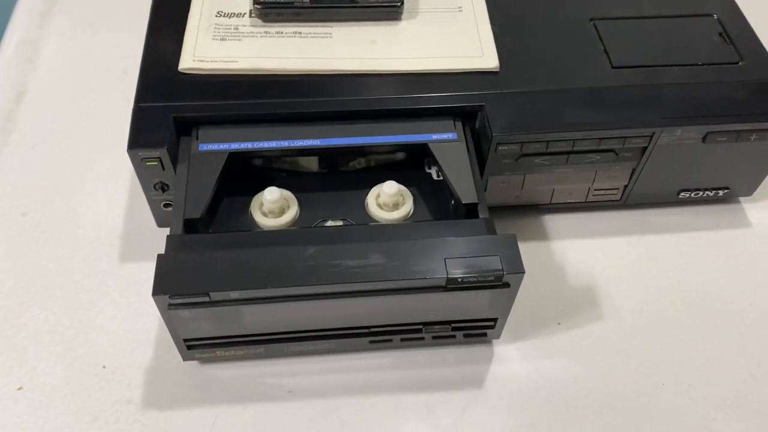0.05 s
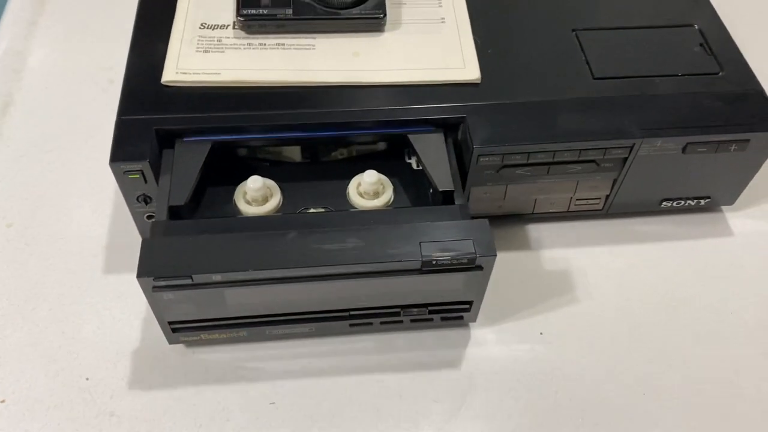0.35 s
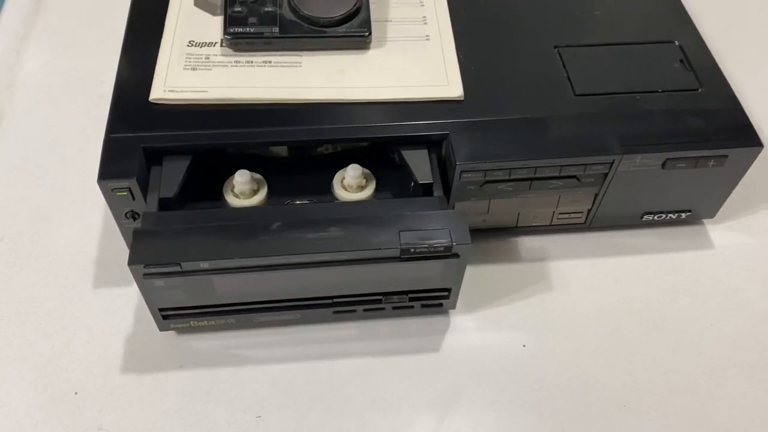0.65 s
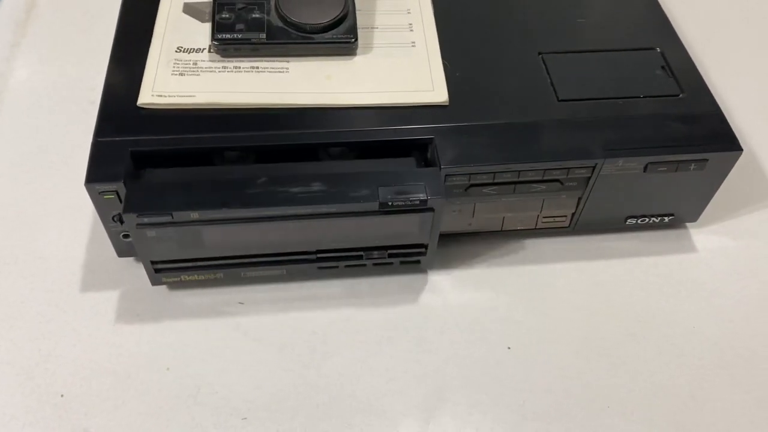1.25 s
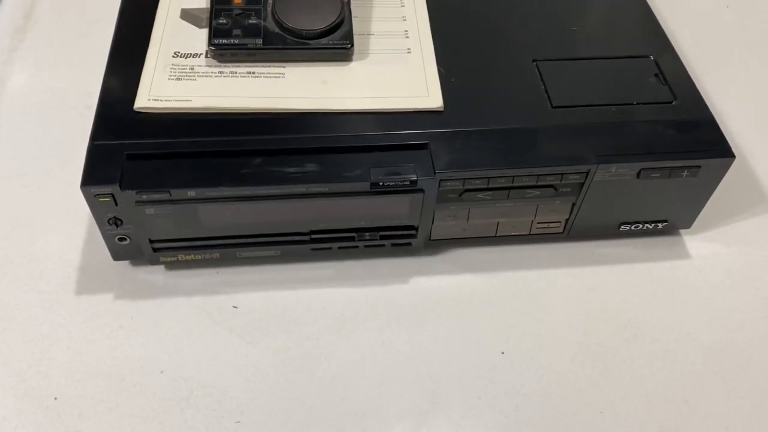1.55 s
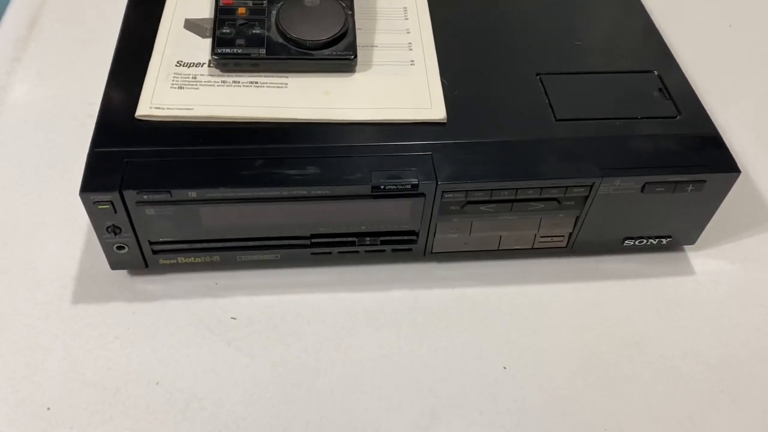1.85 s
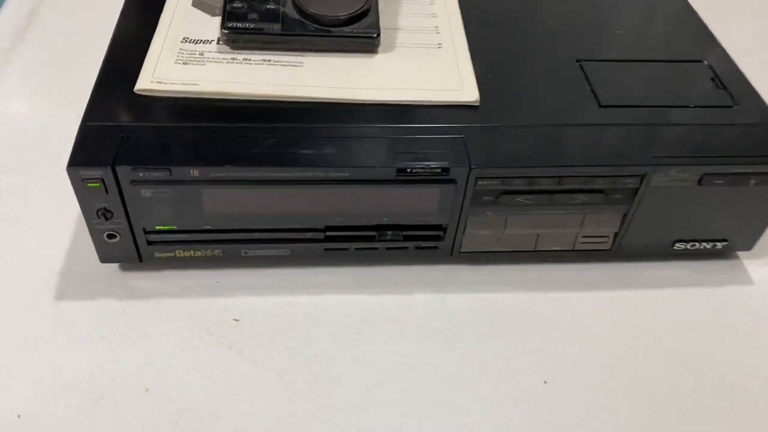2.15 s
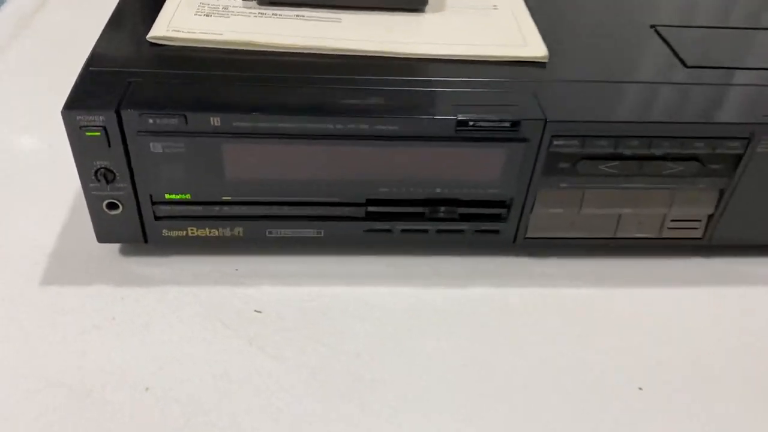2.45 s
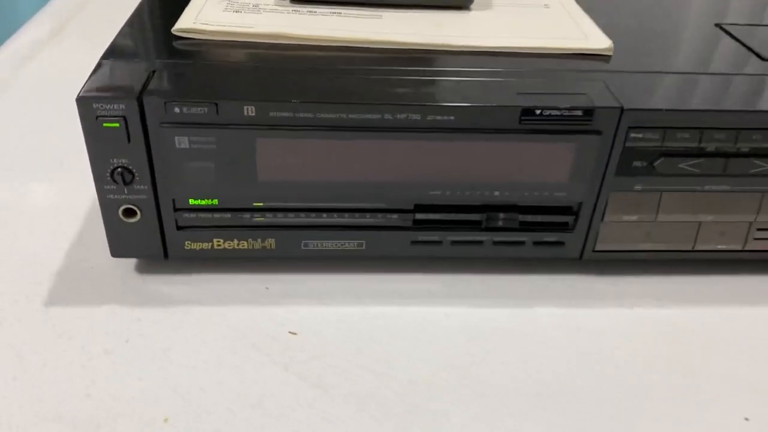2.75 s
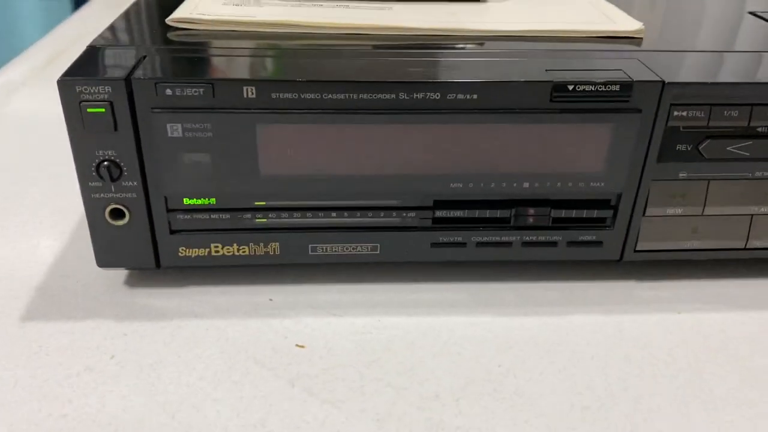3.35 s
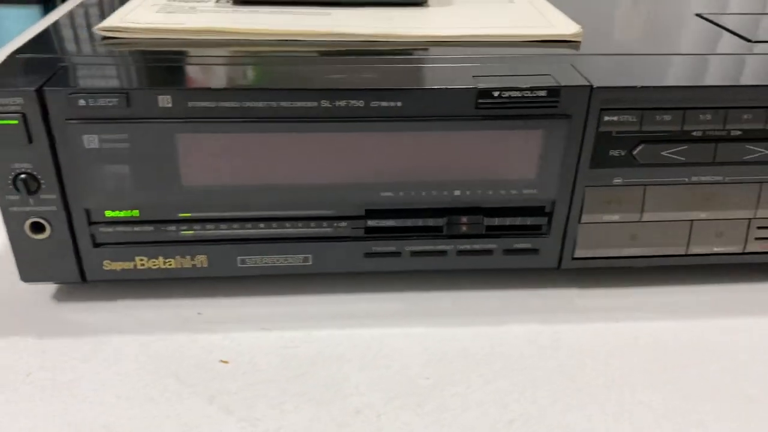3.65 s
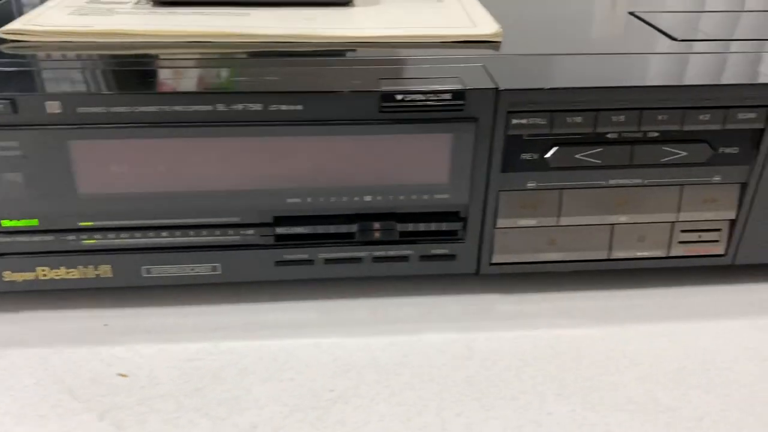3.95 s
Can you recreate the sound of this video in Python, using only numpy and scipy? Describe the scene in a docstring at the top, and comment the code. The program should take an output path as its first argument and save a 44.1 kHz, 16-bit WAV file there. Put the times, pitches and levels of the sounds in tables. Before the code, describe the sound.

A video recorder's motorized tray slides closed near the microphone, with a wavering whir and plastic gear chatter. It scrapes and knocks lightly, then shuts with a clunk, and only a low hum remains in the small room.

```python
"""A small motor hums, whines and rattles close by, drawing a cassette tray shut in a quiet room.
Its tones are harmonics of the shaft rotation; gear tooth impacts excite resonances of the plastic case.
The tray rubs in its rails, bumps on the way and thuds home, ringing in damped modes.
The motor stops, leaving mains hum, a thin transformer buzz, room rumble and two faint rustles."""
import sys
import numpy as np
from scipy import signal
from scipy.fft import rfft, irfft, next_fast_len
from scipy.io import wavfile
from scipy.ndimage import map_coordinates

SR = 44100
rng = np.random.default_rng(int(sys.argv[2]) if len(sys.argv) > 2 else 0)


def store_pcm(level_fs):
    """Save levels as 16-bit WAV."""
    pcm = np.round(np.clip(level_fs, -1, 1) * 32767).astype(np.int16)
    wavfile.write(sys.argv[1], SR, np.atleast_2d(pcm).T)


N = 176400
LEAD = SR // 4  # samples before time zero: the motor is already running
T = np.arange(-LEAD, N) / SR

# likeness of left and right for nearby noises: (frequency [Hz], correlation [1])
NEAR_CORRELATION = [(60, 0.78), (150, 1), (380, 1), (950, 1), (2380, 0.11), (5980, 0.097), (15000, 0.26)]


def amp(db):
    """Decibels to amplitude ratio."""
    return 10 ** (np.asarray(db) / 20)


def unit(x):
    """Normalisation to rms 1."""
    return x / np.sqrt(np.mean(x ** 2) + 1e-20)


def along(points, hz):
    """Interpolation of (frequency [Hz], value) points on a logarithmic axis."""
    f, v = np.transpose(points)
    return np.interp(np.log(hz + 1), np.log(f + 1), v)


def curves(rows):
    """Linear interpolation in time: one curve for each column after the first."""
    times, *columns = np.transpose(rows)
    return [np.interp(T, times, column) for column in columns]


def wobble(rate):
    """Smooth random modulation: a spline through `rate` Gaussian knots a second."""
    knots = rng.standard_normal(4096)
    return map_coordinates(knots, [(T - T[0]) * rate], mode="wrap")


def filtered(x, response):
    """Linear filtering: the spectrum of x times a frequency response."""
    size = next_fast_len(len(T) + SR // 2)
    return irfft(rfft(x, size) * response(np.fft.rfftfreq(size, 1 / SR)), size)[..., :len(T)]


def coloured(x, spectrum):
    """Broad spectral shaping, at rms 1."""
    return unit(filtered(x, lambda hz: amp(along(spectrum, hz))))


def resonate(x, peaks):
    """Forced response of second-order resonators in parallel, at rms 1."""
    return unit(filtered(x, lambda f: sum(
        amp(db) * 1j * f * width / (hz * hz - f * f + 1j * f * width) for hz, width, db in peaks)))


def swells(x, rows):
    """Resonances that each rise and fall under a Gaussian envelope."""
    return sum(amp(db) * np.exp(-((T - peak_s) / half_s) ** 2) * resonate(x, [(hz, width, 0)])
               for hz, width, db, peak_s, half_s in rows)


def noise(correlation):
    """Partly coherent white stereo noise: the mid-to-side ratio sets the correlation."""
    def weights(hz):
        angle = np.arccos(np.clip(along(correlation, hz), -.99, .99)) / 2
        return np.array([np.cos(angle), np.sin(angle)])
    mid, side = filtered(rng.standard_normal((2, len(T))), weights)
    return np.array([mid + side, mid - side])


def room(x):
    """Reverberation: convolution with a diffuse tail that decays exponentially in each band."""
    # room decay: (frequency [Hz], T60 [s])
    decay = [(100, 0.47), (500, 0.38), (2500, 0.44), (7000, 0.45), (14000, 0.15)]
    hz, t, bands = signal.stft(rng.standard_normal((2, SR // 2)), SR, nperseg=256)
    tail = signal.istft(bands * amp(-60 * t / along(decay, hz)[:, None]), SR, nperseg=256)[1]
    tail = tail + 0.28 * tail[::-1]  # left and right share some reflections
    wet = signal.fftconvolve(x, tail / np.linalg.norm(tail[0]), axes=1)[:, :len(T)]
    return filtered(wet, lambda hz: amp(along([(150, 3.0), (500, 5.25), (1500, 0.58)], hz)))


def background():
    """Broadband room rumble under the line spectrum of mains hum, which grows after the motor stops."""
    # rumble spectrum: (frequency [Hz], relative density [dB])
    spectrum = [(25, -17), (42, -6.5), (60, 2), (135, -9.5), (240, -3.5), (450, -13.5), (540, -20.5),
                (1900, -39.5), (2500, -42), (3300, -48.5), (6900, -50.5), (15000, -69)]
    # hum lines: (frequency [Hz], level at a rise gain of 0 dB [dB])
    lines = [(59.6, -76), (119.5, -69.5), (174, -67), (241, -65), (273.5, -70), (313, -66), (358, -62),
             (365, -67.5)]
    # rise of the hum: (time [s], gain [dB])
    rise = [(2, -4.5), (3.1, 0.5), (4, -0.5)]
    rise_db, = curves(rise)
    rumble_gain = amp(-54 + 0.1 * rise_db + 0.4 * wobble(2.6))
    air = noise([(100, 0.97), (400, 0.2), (1200, 0.077), (5000, 0.06)])
    hum = sum(amp(db + wobble(3.58)) * np.sin(2 * np.pi * (hz * T + rng.random()) + 0.8 * wobble(8.1))
              for hz, db in lines)
    return rumble_gain * coloured(air, spectrum) + amp(rise_db) * np.sqrt(2) * hum


def transformer_buzz(pulse_hz=59.45, level_db=-90):
    """Periodic excitation: a pulse train drives the transformer's resonances, heard through the room."""
    # core resonances: (frequency [Hz], bandwidth [Hz], relative level [dB])
    core = [(2510, 160, -3.5), (6750, 130, -9.5)]
    pulses = np.diff(np.floor(pulse_hz * T), prepend=np.floor(pulse_hz * T[0]))
    return amp(level_db) * unit(room(resonate(pulses, core)[None]))


def rustles():
    """Amplitude-modulated band noise: two faint handling rustles."""
    # rustle bands: (frequency [Hz], bandwidth [Hz], level [dB], peak time [s], half length [s])
    bands = [(1600, 810, -80, 2.42, 0.19), (6970, 270, -83.5, 3.7, 0.13)]
    return swells(noise(NEAR_CORRELATION), bands)


def ring(modes, t, attack_s, scatter_db=1.5):
    """Free vibration: damped modes in a slightly different mix at every blow."""
    ringing = sum(amp(db + rng.normal(0, scatter_db) - 60 * t / t60) * np.sin(2 * np.pi * hz * t)
                  for hz, db, t60 in modes)
    return ringing * (1 - np.exp(-t / attack_s))


def tray_knocks():
    """Impact excitation: at the guides and the stop, the plastic tray clacks and the chassis thuds."""
    # impacts: (time [s], relative clack level [dB], relative thud level [dB])
    impacts = [(1.12, -27, -27), (1.193, -24, -55), (1.221, -35, -50), (1.648, -19, -42),
               (1.662, -45, -28.5), (1.675, -38, -26.5), (1.686, -37.5, -29)]
    # modes of tray and chassis: (frequency [Hz], relative level [dB], T60 [s])
    tray_modes = [(366, -2, 0.041), (461, -5, 0.042), (630, -1, 0.027), (735, -4.5, 0.02),
                  (1380, -10, 0.018), (2500, -7, 0.016)]
    chassis_modes = [(32.8, -8, .22), (77, 1, 0.064), (134, 6, 0.071), (167, -1, 0.24)]
    clacks, thuds = np.zeros((2, len(T)))
    t = np.arange(SR // 2) / SR
    for time_s, clack_db, thud_db in impacts:
        start = LEAD + round(time_s * SR)
        clacks[start:start + len(t)] += amp(clack_db - 6.5) * ring(tray_modes, t, attack_s=0.00021)
        thuds[start:start + len(t)] += amp(thud_db - 9.5) * ring(chassis_modes, t, attack_s=0.00053)
    return clacks, thuds


def partials(turns, orders, rough_rad, flutter_db):
    """Harmonics of the shaft rotation, each randomly modulated in level and phase."""
    tones = 0
    for order, db in orders:
        gain = amp(db + flutter_db * wobble(25.38))
        phase = 2 * np.pi * (round(order) * turns + rng.random()) + rough_rad * wobble(60)
        tones += gain * np.sin(phase)
    return np.sqrt(2) * tones


def chatter(turns, swing_db, spiky_db, locked_db):
    """Cyclostationary noise: tooth contacts bunch once a turn, and part of their pattern repeats."""
    steps, lowest_order = 512, 16  # tooth pattern of one turn
    orders = np.arange(steps // 2 + 1)
    pattern = unit(irfft((orders >= lowest_order) * np.exp(2j * np.pi * rng.random(len(orders)))))
    position = (turns + 0.002 * wobble(80)) % 1 * steps
    locked = map_coordinates(pattern, [position], mode="grid-wrap")
    contacts = noise(NEAR_CORRELATION) + amp(locked_db) * locked
    return unit(contacts * amp(swing_db * np.cos(2 * np.pi * turns) + spiky_db * wobble(1500)))


def singing_panel(turns):
    """Forced vibration: the meshing gears make a case panel sing near 800 Hz."""
    # panel envelope: (time [s], relative level [dB])
    envelope = [(0, -40), (.1, -33.5), (.3, -39.5), (.38, -39), (.45, -35), (.54, -40.5), (.65, -35),
                (.8, -40.5), (1, -38.5), (1.06, -36), (1.35, -40.5), (1.42, -32.5), (1.58, -45)]
    # mesh tones: (shaft order [1], relative level [dB])
    orders = [(9, 3), (10, -1.5), (14, -3)]
    # panel resonances: (frequency [Hz], bandwidth [Hz], relative level [dB])
    modes = [(757, 26, -2), (809, 24, 0), (1146, 30, -7)]
    sing_db, = curves(envelope)
    tones = partials(turns, orders, rough_rad=.6, flutter_db=0.5)
    teeth = amp(21.5) * chatter(turns, swing_db=3.5, spiky_db=2.0, locked_db=-10)
    return amp(sing_db - 5.5) * resonate(tones + teeth, modes)


def rails(turns, rack_db=-51):
    """Sliding friction and the tones of the tray's rack excite the same rail resonances."""
    # rubbing of the tray: (time [s], level [dB])
    friction = [(0, -48), (.22, -49.5), (1.02, -49), (1.19, -38.5), (1.32, -50), (1.64, -48)]
    # rack tones: (shaft order [1], relative level [dB])
    orders = [(5, 0.5), (6, -1.5)]
    # rail resonances: (frequency [Hz], bandwidth [Hz], relative level [dB])
    modes = [(335, 45, -3), (408, 20, -5), (440, 24, -3), (478, 18, 0), (700, 40, -9)]
    rub_db, = curves(friction)
    rack = partials(turns, orders, rough_rad=.6, flutter_db=4.5)
    return amp(rack_db) * resonate(rack, modes) + amp(rub_db) * resonate(noise(NEAR_CORRELATION), modes)


def bay(turns):
    """Time-varying resonance: driven by the teeth, modes of the bay come and go as the tray slides in."""
    # bay resonances: (frequency [Hz], bandwidth [Hz], level [dB], peak time [s], half length [s])
    modes = [(626.5, 29, -49.5, 1.31, 0.25), (2626, 29, -51, 0.85, 1.3), (2733, 42, -51.5, 0.33, 0.98),
             (3120, 260, -52.5, 1.28, 0.17), (3257, 88, -56, 0.64, 1.03), (3430, 71, -54, 0.17, 0.54),
             (3946, 90, -52.5, 0.09, 0.37), (4156, 52, -54.5, .7, .3), (4450, 38, -56.5, 0.44, 0.24),
             (5560, 1400, -65, 1.2, 0.036)]
    return swells(chatter(turns, swing_db=0.5, spiky_db=5.0, locked_db=3.5), modes)


def gear_rattle(turns, shielding_db_per_s=4):
    """Broadband impact noise: teeth ring the case, clatter, tick and sizzle."""
    # rattle envelopes: (time [s], clatter level [dB], ticking level [dB])
    envelopes = [(0, -43.5, -49.5), (.45, -43, -50.5), (.92, -44, -50.5), (1.12, -42.5, -46),
                 (1.21, -42.5, -48), (1.36, -43, -50.5), (1.56, -43.5, -49), (1.64, -44.5, -53.5)]
    # case and sizzle resonances: (frequency [Hz], bandwidth [Hz], relative level [dB])
    case_modes = [(976, 20, 3.5), (1296, 105, -6.5), (1647, 14, 5), (1805, 67, 3.5), (2248, 26, 5)]
    sizzle_modes = [(10920, 390, 0), (14900, 450, -2.3)]
    # tooth noise spectra: (frequency [Hz], relative density [dB])
    clatter_spectrum = [(30, -23), (60, -1.5), (130, 7), (210, -17), (340, 7), (560, -8), (950, -2),
                        (1400, 0), (2300, -3.5), (2850, -6), (3700, -14), (16000, -59)]
    tick_spectrum = [(500, -39), (2500, -11), (4300, 8.5), (5000, -0.5), (6100, 4.5), (7800, -3),
                     (16000, -37.5)]
    rattle_db, tick_db = curves(envelopes)
    even_teeth = chatter(turns, swing_db=-0.5, spiky_db=2.0, locked_db=-4)
    bunched_teeth = chatter(turns, swing_db=3.5, spiky_db=2.0, locked_db=-1.5)
    tips = chatter(turns, swing_db=1.5, spiky_db=2.8, locked_db=-6)
    case = amp(rattle_db - 4.5) * resonate(even_teeth, case_modes)
    clatter = amp(rattle_db) * coloured(bunched_teeth, clatter_spectrum)
    ticking = amp(tick_db + 1.3 * wobble(12.05)) * coloured(tips, tick_spectrum)
    sizzle = amp(-53 - shielding_db_per_s * T) * resonate(tips, sizzle_modes)  # the tray shields it
    return case + clatter + ticking + sizzle


def hum_and_whine(turns):
    """Rotational harmonics: the shaft hums at orders one and two, the gears whine at order four."""
    # tone envelopes: (time [s], gain [dB])
    hum_envelope = [(0, -45), (.9, -46), (1.12, -45), (1.22, -48.5), (1.46, -46), (1.56, -56)]
    whine_envelope = [(0, -42), (.07, -39), (.13, -42.5), (.2, -39.5), (.3, -42.5), (.37, -39), (.45, -44),
                      (.53, -38), (.66, -43.5), (.8, -41), (.88, -44.5), (.94, -38), (1.12, -38.5),
                      (1.18, -47), (1.31, -39), (1.36, -43), (1.42, -36), (1.54, -36), (1.6, -48)]
    # shaft and gear tones: (shaft order [1], relative level [dB])
    hum_orders = [(1, 1), (2, -8)]
    whine_orders = [(4, 0.6)]
    hum_db, = curves(hum_envelope)
    whine_db, = curves(whine_envelope)
    hum = amp(hum_db) * partials(turns, hum_orders, rough_rad=0.12, flutter_db=1.3)
    whine = amp(whine_db) * partials(turns, whine_orders, rough_rad=.19, flutter_db=3.5)
    return hum + whine


def motor(stop_s=1.672, coast_t60_s=0.05):
    """Phase locking: tones and rattle follow one shaft and decay together at power off."""
    # shaft speed, sagging under load: (time [s], speed [turns/s])
    shaft_speed = [(0, 79), (.1, 88.6), (.25, 82.3), (.45, 81.8), (.54, 86.7), (.63, 82.3), (.88, 81),
                   (.98, 85.8), (1.14, 87), (1.22, 77), (1.3, 83), (1.45, 89), (1.55, 85), (1.64, 77.5)]
    speed, = curves(shaft_speed)
    turns = np.cumsum(speed) / SR
    tones = hum_and_whine(turns)
    rattle = singing_panel(turns) + rails(turns) + bay(turns) + gear_rattle(turns)
    running = amp(-60 * np.maximum(T - stop_s, 0) / coast_t60_s)
    return running * tones, running * rattle


def scene(room_send_db=-6.5):
    """Superposition in a small room; a level difference places the mechanism a little to the left."""
    # stereo balance: (frequency [Hz], left over right [dB])
    balance = [(60, -0.5), (130, -2.5), (290, -2.5), (640, 3.5), (1410, 1), (3100, 4.5), (6820, 1.0),
               (15000, -0.5)]
    tones, rattle = motor()
    clacks, thuds = tray_knocks()
    reverb = amp(room_send_db) * room(rattle + clacks)  # low tones and thuds stay dry
    machine = tones + rattle + clacks + thuds + reverb
    placed = filtered(machine, lambda hz: amp(along(balance, hz) * np.array([[.5], [-.5]])))
    return (placed + background() + transformer_buzz() + rustles())[:, LEAD:]


def record(dry):
    """Band limiting: a second-order roll-off of the deepest bass and a sharp cut of the top treble."""
    low_cut_hz, top_hz = 34, 15800
    return filtered(dry, lambda hz: (hz < top_hz) * hz ** 2 / np.hypot(hz ** 2, low_cut_hz ** 2))[:, :N]


dry = scene()
out = record(dry)
store_pcm(out)
```